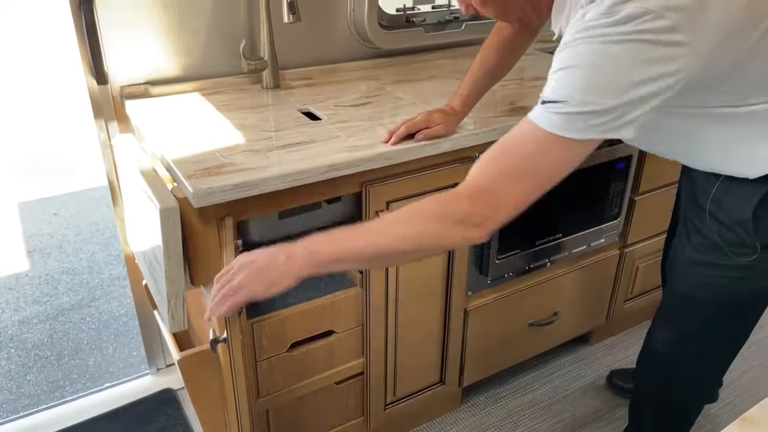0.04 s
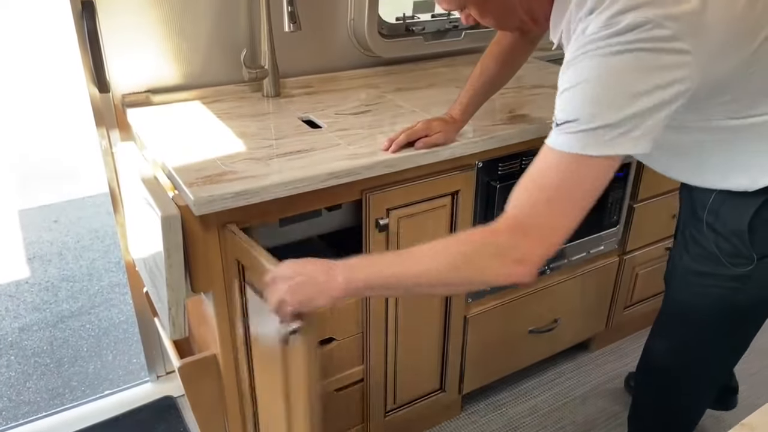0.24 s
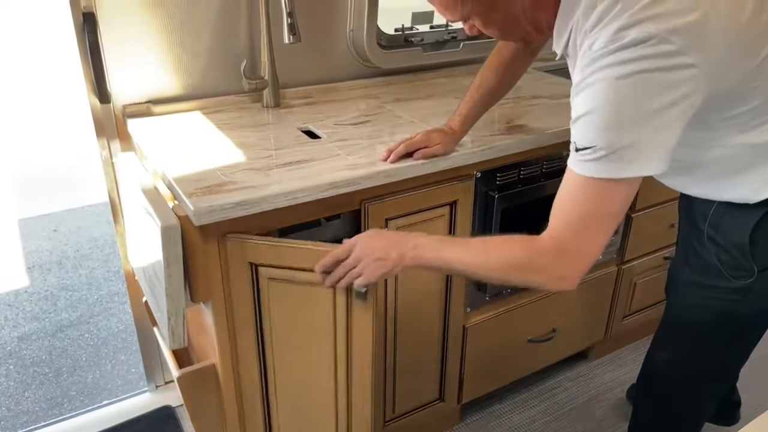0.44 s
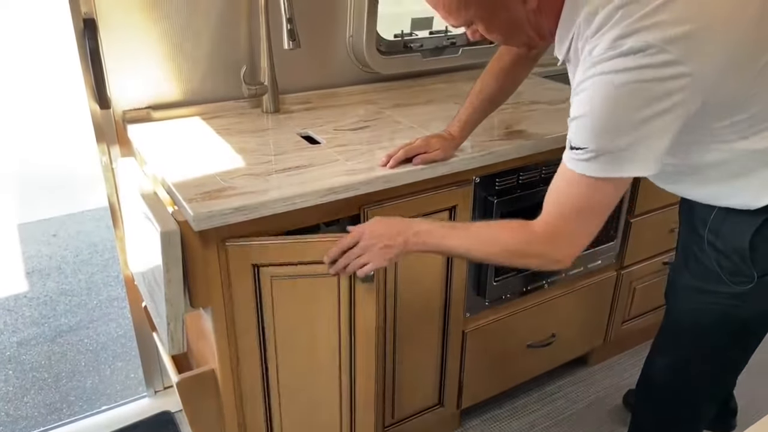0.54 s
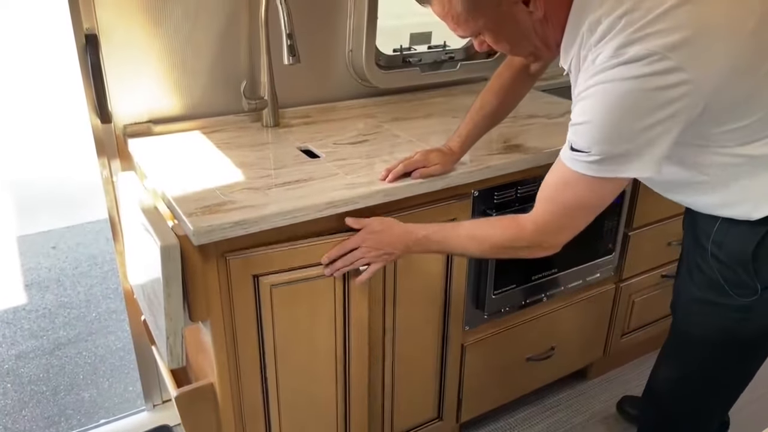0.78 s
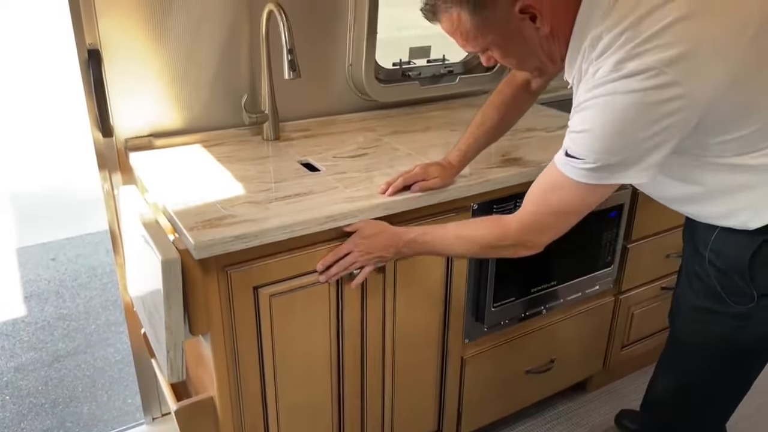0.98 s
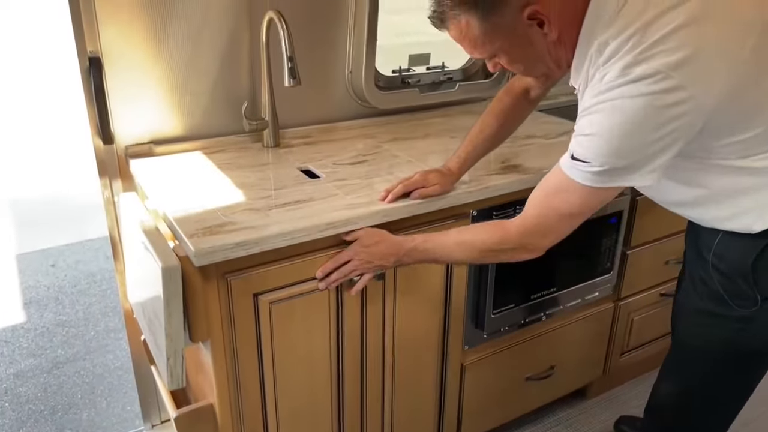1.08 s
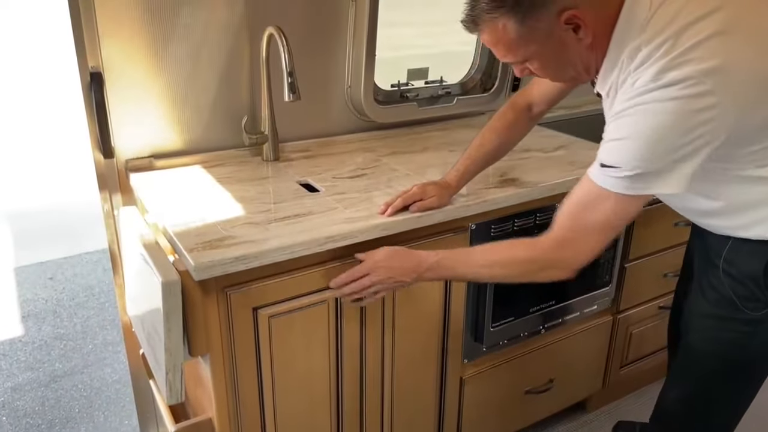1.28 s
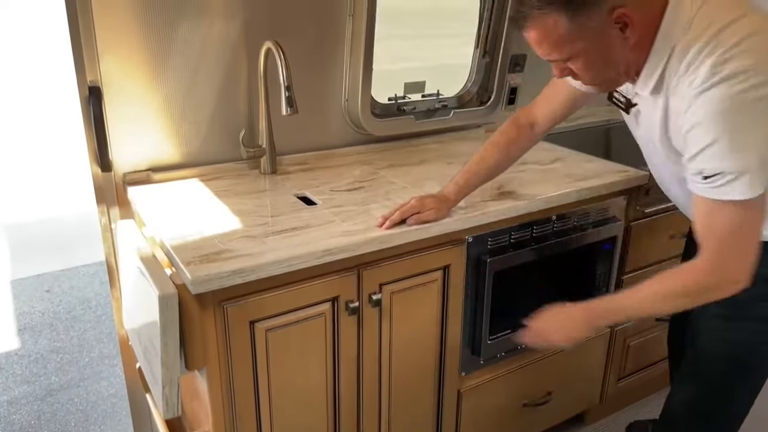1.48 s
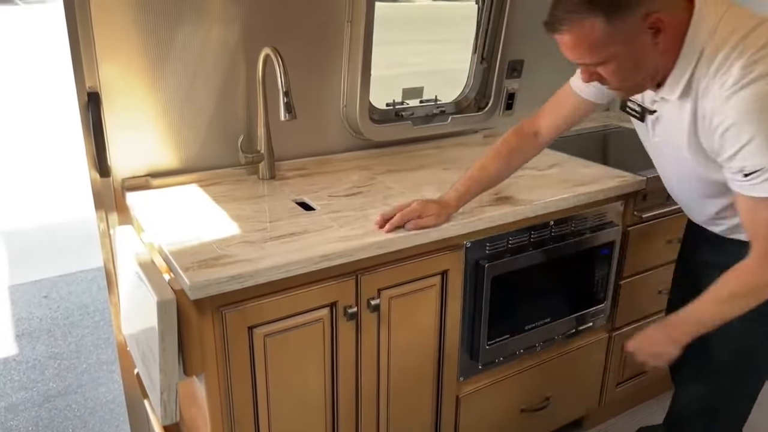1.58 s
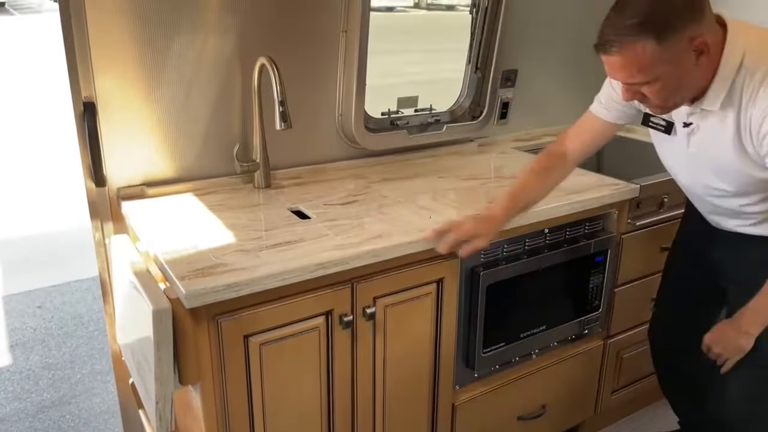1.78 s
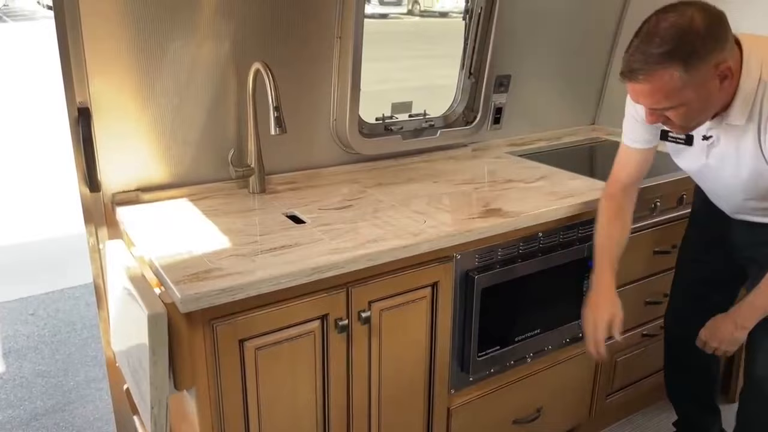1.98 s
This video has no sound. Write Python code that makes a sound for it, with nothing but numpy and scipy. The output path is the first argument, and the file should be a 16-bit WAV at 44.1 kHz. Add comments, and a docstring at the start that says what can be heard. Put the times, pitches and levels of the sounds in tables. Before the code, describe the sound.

A wooden cabinet door shuts with one sharp knock and catch click over low hum.

```python
"""A wooden cabinet door pushed shut in a small, well damped room, heard a little right of centre.
Ventilation air and a low hum lie under everything; hinge and sleeve rustle faintly at the start.
Just before 1 s the door brushes its catch, the catch snaps in, and the panel knocks on the frame
and rings briefly. Thin squeaks follow, then tiny dry ticks close to the microphone among more
rustling, and near the end a soft footfall."""
import sys
import numpy as np
from scipy import signal
from scipy.fft import rfft, irfft, next_fast_len
from scipy.io import wavfile

SR = 44100
rng = np.random.default_rng(int(sys.argv[2]) if len(sys.argv) > 2 else 0)


def int16_out(signal):
    """Quantize to a 16-bit WAV file."""
    q = np.round(np.clip(np.atleast_2d(signal).T, -1, 1) * 32767)
    wavfile.write(sys.argv[1], SR, q.astype(np.int16))


N = 89478
T = np.arange(N) / SR
FREQS = np.maximum(np.arange(N // 2 + 1) * SR / N, 1)


def from_db(db):
    """Decibels to gain."""
    return 10 ** (np.asarray(db) / 20)


def at_hz(points, hz):
    """Read a table on a log-frequency axis."""
    freqs, values = np.transpose(points)
    return np.interp(np.log(hz), np.log(freqs), values)


def noise(gain):
    """Unit-rms noise, shaped by a gain at each frequency."""
    shaped = irfft(rfft(rng.standard_normal(N)) * gain, N)
    return shaped / np.sqrt(np.mean(shaped ** 2) + 1e-20)


def band_noise(hz, width_hz):
    """Unit-rms noise gathered around one frequency."""
    return noise(1 / (1 + (2 * (FREQS - hz) / width_hz) ** 2))


def since(s):
    """Time since s, zero before."""
    return np.maximum(T - s, 0)


def ring(s, hz, db, t60):
    """One mode struck at s, falling 60 dB in t60 seconds."""
    t = since(s)
    return from_db(db - 60 * t / t60) * np.sin(2 * np.pi * hz * t)


def pulse(s, hz, width_hz, db):
    """A heavily damped resonance that swells and dies within a few cycles."""
    t = since(s)
    age = np.pi * width_hz * t / 2
    return from_db(db) * (age * np.exp(1 - age)) ** 2 * np.sin(2 * np.pi * hz * t)


def diffuse(s, colour, t60s, rise_s):
    """Dense resonances set off at s; each half octave dies at its own rate."""
    t, size = since(s), next_fast_len(N, real=True)
    spectrum = rfft(noise(from_db(at_hz(colour, FREQS))), size)
    bin_hz = np.maximum(np.arange(len(spectrum)) * SR / size, 40)
    half_octave = np.round(2 * np.log2(bin_hz))
    out = 0
    for k in np.unique(half_octave):
        band = irfft(spectrum * (half_octave == k), size)[:N]
        out += band * from_db(-60 * t / at_hz(t60s, 2 ** (k / 2)))
    return out * (1 - np.exp(-t / rise_s))


# colour of the air in the room: (frequency [Hz], relative density [dB])
AIR_COLOUR = [(8, -17), (25, -8.5), (50, -6), (80, -2), (125, -4), (150, -12.5), (180, -6), (260, -12),
              (330, -17), (480, -10), (640, -15), (950, -13), (1250, -23), (1900, -31), (3000, -42.5),
              (5000, -52), (8000, -62), (15000, -64.5)]
# slow swell of that air: (time [s], level [dB])
AIR_SWELL = [(0, -41), (.12, -39.5), (.35, -42), (.85, -41), (1.1, -42.5), (1.3, -40.5), (1.7, -40),
             (2.03, -42)]
# lift of its treble: (time [s], gain [dB])
AIR_TREBLE_LIFT = [(0, 0.5), (.45, 1.5), (.65, 0), (1.1, 0), (1.3, 2), (1.5, 4.5), (1.75, 2.5), (2.03, 7.5)]
# narrow bands of the hum: (centre [Hz], starting level [dB], width [Hz], drift [dB/s])
HUM_BANDS = [(82.94, -48, 4.2, -1), (119.8, -48, 14, -1), (179.7, -49.5, 18, -8)]


def ventilation(treble_hz=1730):
    """Room tone: steady ventilation air with a wavering low hum."""
    air = noise(from_db(at_hz(AIR_COLOUR, FREQS)))
    treble = irfft(rfft(air) / (1 + (treble_hz / FREQS) ** 4), N)
    lift = from_db(np.interp(T, *np.transpose(AIR_TREBLE_LIFT)))
    swell = from_db(np.interp(T, *np.transpose(AIR_SWELL)))
    hum = sum(from_db(db + drift * T) * band_noise(hz, width) for hz, db, width, drift in HUM_BANDS)
    return (air + treble * (lift - 1)) * swell + hum


# soft rubs: (time [s], rise [s], hold [s], 20 dB fall [s], level [dB], centre [Hz], half width [oct])
RUBS = [(0.008, 0.11, 0.038, 0.072, -61.5, 2580, 0.13), (.005, 0.023, 0.2, 0.056, -72.5, 4200, 0.096),
        (0.105, 0.049, 0.039, 0.37, -65.5, 10500, 0.96), (0.108, 0.035, 0.39, 0.04, -76, 10640, 0.13),
        (1.455, .04, 0.062, 0.24, -70.5, 7900, 0.48), (1.458, 0.028, .04, 0.085, -60.5, 2580, 0.49),
        (1.802, 0.014, .01, 0.26, -70.5, 9000, 0.65), (1.944, 0.0071, 0.021, 0.049, -57, 4080, 0.4)]


def rustles():
    """Hinge, sleeve and hand rub faintly: bands of noise that swell, hold and fade."""
    out = 0
    for s, rise, hold, fall, db, hz, octaves in RUBS:
        envelope = np.minimum(since(s) / rise, 1) * from_db(db - 20 * since(s + rise + hold) / fall)
        out += envelope * noise(1 / (1 + (np.log2(FREQS / hz) / octaves) ** 2))
    return out


# the catch is brushed, snaps in, rattles and is jolted by the knock:
# (time [s], level [dB], dulling above 1 kHz [dB/oct], rise [s], thump level [dB])
CATCH_CONTACTS = [(0.921, -28, 5.5, 0.0021, -58), (0.9423, -23.5, -0.5, 0.00065, -19.5),
                  (0.957, -32, 5.5, 0.0005, -23), (0.9692, -27.5, 5.5, 0.00029, -19)]
# ring of the catch: (frequency [Hz], relative level [dB], t60 [s])
CATCH_RINGS = [(1315, -12, .14), (1508, -19, .14), (1688, -20, .15), (1734, -17.5, .15), (1767, -18, .15),
               (1980, -17, .13), (2105, -21, .12), (3075, -21, .12), (3190, -23, .13), (3842, -18, .1),
               (9200, -23, .12)]
# colour of its clatter: (frequency [Hz], relative density [dB])
CLATTER_COLOUR = [(10, -34), (100, 6), (200, -9.5), (350, -17), (660, 1.5), (1000, -13.5), (1300, -10.5),
                  (2100, -11.5), (2750, -21.5), (3900, -19.5), (6400, -30), (8000, -24), (9000, -16.5),
                  (10200, -25), (15000, -35)]
# decay of its clatter: (frequency [Hz], t60 [s])
CLATTER_DECAY = [(200, 0.23), (1500, 0.063), (4000, 0.12), (9000, 0.075), (15000, 0.14)]


def catch():
    """Each contact with the catch cracks, clatters, rings its spring and nudges the cabinet."""
    crack_hz, crack_db, crack_t60 = 2470, -5, 0.013  # bright first instant
    spring_hz, spring_db, spring_t60 = 9100, -32.5, 0.23  # cluster of close modes
    out = 0
    for s, db, dull_db, rise_s, thump_db in CATCH_CONTACTS:
        dulling = lambda hz: dull_db * max(np.log2(hz / 1000), 0)
        t = since(s)
        crack = noise(FREQS / (FREQS + crack_hz))
        crack *= from_db(crack_db - dulling(crack_hz) - 60 * t / crack_t60)
        spring = band_noise(spring_hz, width_hz=2300)
        spring *= from_db(spring_db - dulling(spring_hz) - 60 * t / spring_t60)
        rings = sum(ring(s, hz, level - dulling(hz), t60) for hz, level, t60 in CATCH_RINGS)
        colour = [(hz, level - dulling(hz)) for hz, level in CLATTER_COLOUR]
        clatter = diffuse(s, colour, CLATTER_DECAY, rise_s)
        thump = ring(s + rise_s, hz=51.3, db=thump_db, t60=0.08)
        attack = 1 - np.exp(-t / rise_s)
        out += from_db(db) * ((crack + spring + rings) * attack + clatter) + thump
    return out


# blow of panel on frame: (centre [Hz], width [Hz], level [dB], delay [s])
BLOW_PULSES = [(700, 524, -3, 0.00075), (140, 120, -21.5, 0.0038)]
# modes of door and cabinet: (frequency [Hz], relative level [dB], t60 [s])
WOOD_MODES = [(80, -20, .26), (103, -20.5, .22), (258, -16.5, .2), (276, -25, .2), (294, -22, .17),
              (392, -27, .2), (450, -22.5, .14), (496, -27, .16), (535, -30, .13), (583, -23.5, .14),
              (654, -22, .14), (678, -20.5, .13), (754, -24, .15), (876, -26, .15), (905, -31, .16),
              (1016, -27, .11), (1192, -36, .14), (1315, -42, .13)]
# diffuse ring of cabinet and room: (frequency [Hz], relative density [dB])
ROOM_COLOUR = [(10, -30), (32, -3), (100, -21), (150, -5), (195, -9), (280, -8), (500, -4), (900, 0.5),
               (1400, -18), (2500, -32), (4500, -42), (8000, -45), (15000, -52)]
# decay of that ring: (frequency [Hz], t60 [s])
ROOM_DECAY = [(80, 0.74), (280, 0.31), (700, 0.059), (2000, 0.14), (10000, 0.077)]


def door(knock_s=0.9665, rebound_s=1):
    """The panel knocks on the frame, springs back and meets it again; wood and room ring on."""
    echo_delay_s, echo_db, echo_cut_hz = 0.009, -10, 390  # off a near surface, about 3 m more path
    modes_db, build_cycles = -0.5, 0.67  # low modes take longer to swell
    tail_delay_s, tail_db = 0.0017, -20.5
    blow = -sum(pulse(knock_s + delay, hz, width, db) for hz, width, db, delay in BLOW_PULSES)
    lowpass = signal.butter(1, echo_cut_hz, fs=SR, output="sos")
    echo = signal.sosfilt(lowpass, np.interp(T - echo_delay_s, T, blow))
    rebound = pulse(rebound_s, hz=394, width_hz=520, db=-14)
    modes = 0
    for hz, db, t60 in WOOD_MODES:
        build = 1 - np.exp(-(since(knock_s) * hz / build_cycles) ** 2)
        modes -= ring(knock_s, hz, db, t60) * build
    tail = diffuse(knock_s + tail_delay_s, ROOM_COLOUR, ROOM_DECAY, rise_s=0.0038)
    return blow + from_db(echo_db) * echo + rebound + from_db(modes_db) * modes + from_db(tail_db) * tail


# faint squeaks: (time [s], length [s], pitch [Hz], bend in the middle [Hz], level [dB])
THIN_SQUEAKS = [(1.08, 0.081, 11100, 60, -81.5), (1.08, 0.14, 6400, -130, -82),
                (1.322, .05, 10150, 250, -79), (1.356, 0.042, 9800, -450, -78),
                (1.736, 0.088, 10500, -250, -75)]


def squeaks(waver_hz=50, waver_rate_hz=160):
    """Thin tones that swell, bend in pitch and waver as they go."""
    out = 0
    for s, length, hz, bend_hz, db in THIN_SQUEAKS:
        arch = np.sin(np.pi * np.minimum(since(s) / length, 1))
        waver = waver_hz * noise(1 / (1 + (FREQS / waver_rate_hz) ** 2))
        pitch = hz + bend_hz * arch + waver
        out += from_db(db) * arch * np.sin(2 * np.pi * np.cumsum(pitch) / SR)
    return out


# dry ticks at close range: (time [s], centre [Hz], width [Hz], level [dB])
CLOSE_TICKS = [(1.2981, 10000, 7000, -36), (1.304, 9000, 5030, -44), (1.4017, 1220, 1100, -28),
               (1.401, 3060, 1800, -31.5), (1.4012, 11300, 3600, -40.5), (1.4222, 2980, 6000, -39),
               (1.441, 4240, 600, -51), (1.4293, 9750, 3500, -46), (1.4415, 7940, 9000, -41.5),
               (1.4511, 6500, 8000, -47), (1.471, 7500, 8050, -45), (1.954, 7700, 7960, -40)]


def ticks(scuff_db=-22, scuff_t60=0.023):
    """Tiny clicks, each trailed by a rough scuff, too near the microphone to carry any room."""
    out = 0
    for s, hz, width, db in CLOSE_TICKS:
        scuff_envelope = (T > s) * from_db(db + scuff_db - 60 * since(s) / scuff_t60)
        out += pulse(s, hz, width, db) + scuff_envelope * band_noise(hz, width)
    return out


# thud of a foot on the floor: (frequency [Hz], relative density [dB])
FOOTFALL_COLOUR = [(30, -5), (80, 10), (200, -6), (400, 4), (540, 0), (690, 10), (830, 5.5), (1050, 7),
                   (1500, -2), (3000, -18.5), (8000, -26), (15000, -47)]


def footfall(s=1.827, thud_db=-41.5, thud_t60=0.24, rise_s=0.0021):
    """A soft step, dulled by the floor, whose panel rings briefly under the foot."""
    thud = from_db(thud_db) * diffuse(s, FOOTFALL_COLOUR, [(1000, thud_t60)], rise_s)
    floor = ring(s, hz=828, db=-36, t60=0.16)
    return thud + floor * (1 - np.exp(-since(s) / rise_s))


def scene(left_db=-4.5):
    """Everything reaches one microphone position and sits a little right of centre."""
    mix = ventilation() + rustles() + catch() + door() + squeaks() + ticks() + footfall()
    sides = from_db([[left_db], [0]])
    return mix * sides / sides.mean()


def record(dry, cutoff_hz=15750):
    """A steep low-pass after the microphone cuts the very top."""
    return signal.sosfilt(signal.ellip(10, .2, 80, cutoff_hz, fs=SR, output="sos"), dry)


dry = scene()
out = record(dry)
int16_out(out)
```